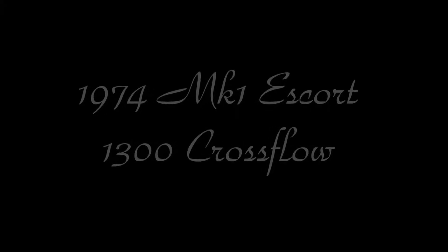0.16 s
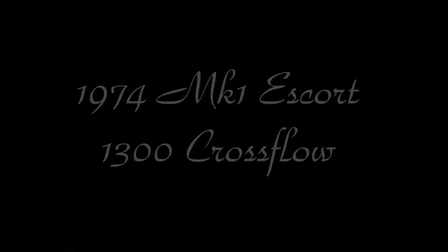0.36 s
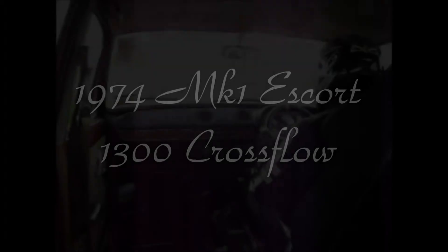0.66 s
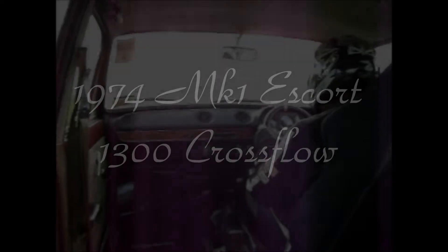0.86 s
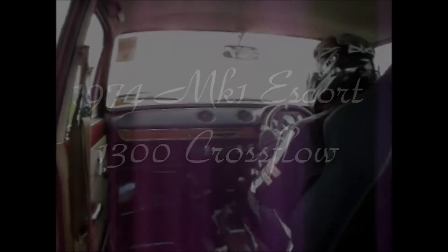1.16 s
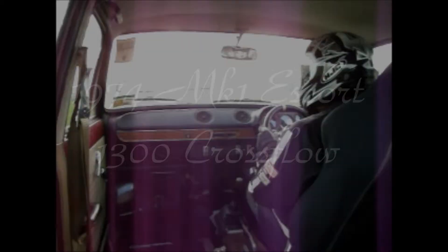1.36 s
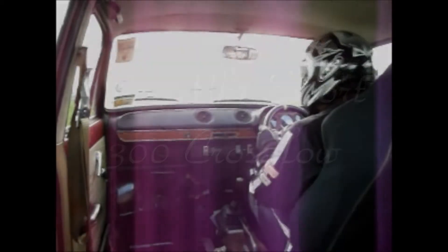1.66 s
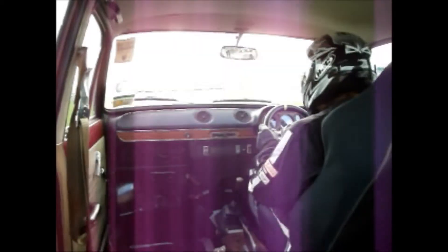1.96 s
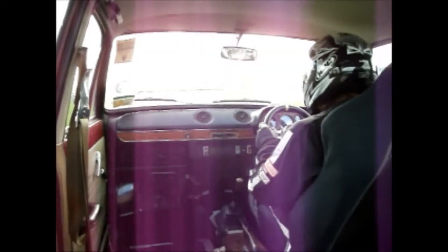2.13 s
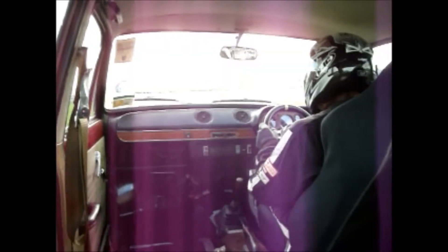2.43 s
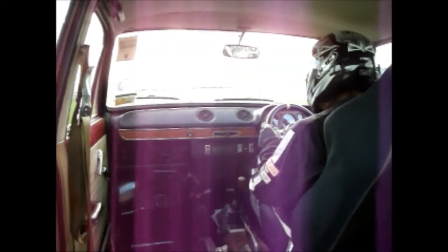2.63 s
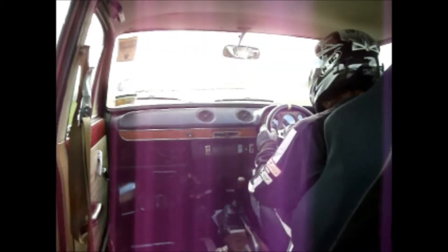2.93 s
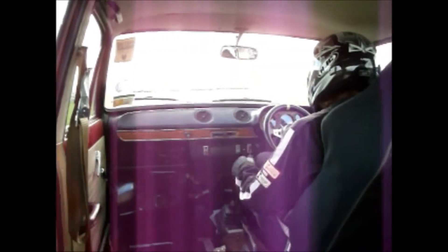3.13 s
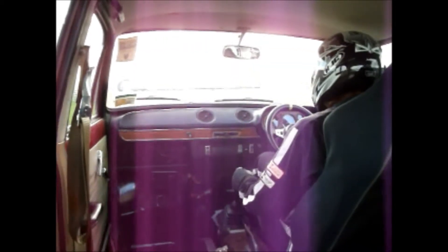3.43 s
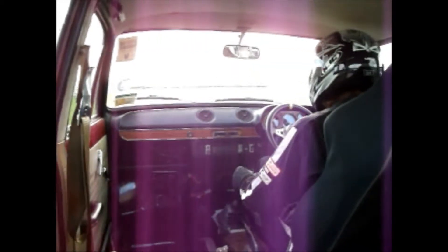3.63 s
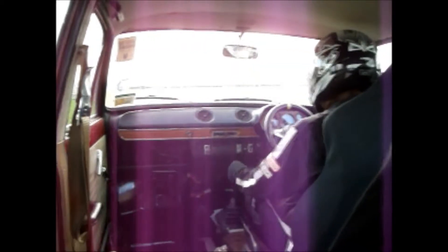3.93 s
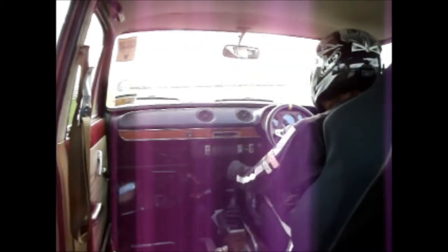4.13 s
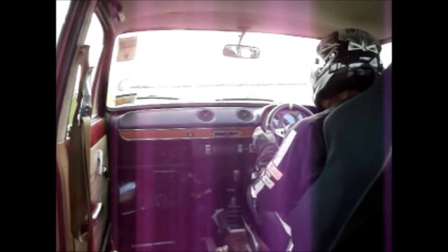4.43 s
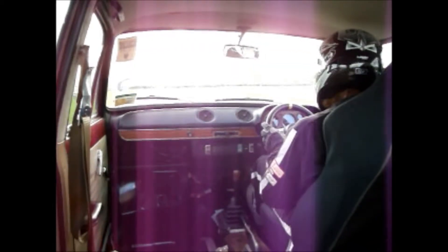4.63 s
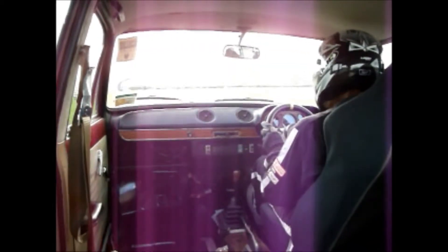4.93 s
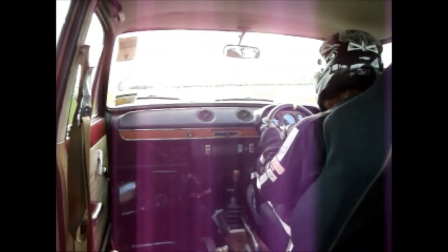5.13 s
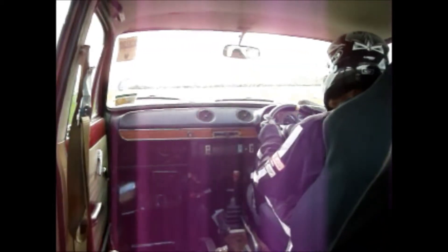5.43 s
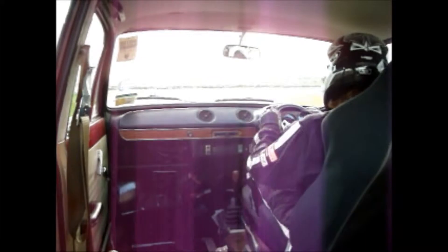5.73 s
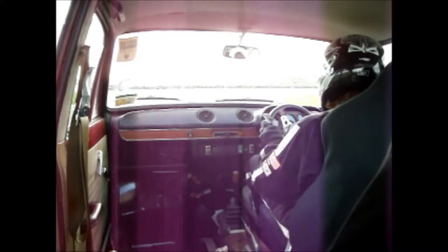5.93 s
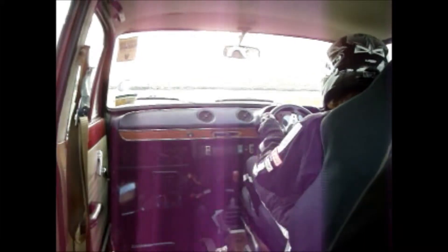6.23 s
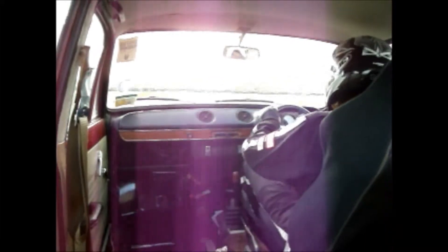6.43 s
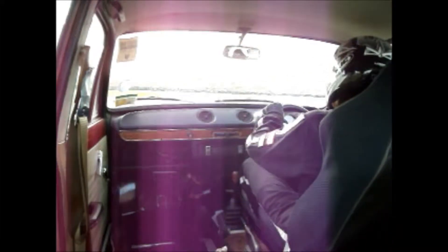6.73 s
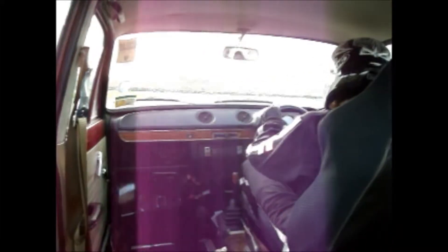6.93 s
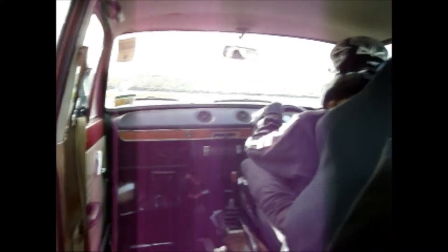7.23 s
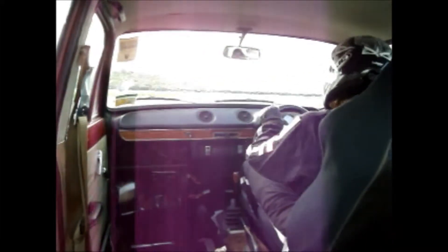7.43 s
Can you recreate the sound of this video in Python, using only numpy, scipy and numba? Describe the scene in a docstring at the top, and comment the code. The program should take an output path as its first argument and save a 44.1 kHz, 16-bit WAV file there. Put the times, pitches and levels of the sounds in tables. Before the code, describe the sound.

Wind buffets rapidly through an open window while a small petrol engine booms at steady high revs, heard on a slightly muffled microphone inside the cabin. The car brakes with a shudder and a faint gear whine, and the engine pitch sinks. A quick rev marks a downshift, followed by wavering tyre squeal with brief shrieks as the car slides round a track corner and accelerates again.

```python
"""Inside a small four-cylinder saloon on a race track. The sound cuts in with the engine pulling, louder
from about 1 s, over road and wind roar. Air throbs through an open window about twenty times a second.
A fast limiter turns everything down under each throb, so the whole sound flutters. Near 3 s the
driver lifts off, the gears whine and the body shudders under braking. A downshift follows just after
5 s, then the car slides and its tyres squeal as the rubber sticks and slips."""
import sys
import numpy as np
from scipy import signal
from scipy.fft import rfft, irfft, next_fast_len
from scipy.io import wavfile
from numba import njit

SR = 44100
rng = np.random.default_rng(int(sys.argv[2]) if len(sys.argv) > 2 else 0)


def materialize(psi):
    """Save the field psi as 16-bit PCM at rate SR to the path in sys.argv[1].

    A 1-D psi becomes a single channel; in a 2-D psi each row is a channel.
    """
    bounded = np.clip(np.atleast_2d(psi).T, -1, 1)
    quanta = np.round(bounded * 32767).astype(np.int16)
    wavfile.write(sys.argv[1], SR, quanta)


N = 333837
TIME = np.arange(N) / SR


def from_db(db):
    """Turn decibels into a number to multiply by."""
    return 10 ** (np.asarray(db) / 20)


def curves(table):
    """Join a table's timed points with straight lines, one curve for each column after the time."""
    times, *columns = np.transpose(table)
    return [np.interp(TIME, times, column) for column in columns]


def unit_level(x):
    """Scale a signal to an average (rms) size of 1."""
    return x / np.std(x)


def wobble(rate_hz):
    """A smooth random wiggle of size 1 that turns about rate_hz times a second."""
    smooth = signal.resample_poly(rng.standard_normal(8192), 8, 1)
    return unit_level(np.interp(TIME * rate_hz * 8, np.arange(len(smooth)), smooth))


def noise(colour):
    """Noise of size 1; the colour table says how strong its low and high pitches are."""
    hz, db = np.transpose(colour)
    size = next_fast_len(N)
    bins_hz = np.maximum(np.fft.rfftfreq(size, 1 / SR), 1)
    gain = from_db(np.interp(np.log(bins_hz), np.log(hz), db))
    return unit_level(irfft(rfft(rng.standard_normal(size)) * gain, size)[:N])


def angle(hz):
    """The angle of something turning hz times a second, from a random start."""
    return 2 * np.pi * (np.cumsum(hz) / SR + rng.random())


def tone(phase):
    """A pure tone of size 1."""
    return np.sqrt(2) * np.sin(phase)


def held(start, end, attack_s, release_s):
    """Rise from 0 to 1 at the start, hold, and fall back after the end."""
    return np.clip((TIME - start) / attack_s, 0, 1) * np.clip(1 - (TIME - end) / release_s, 0, 1)


def swells(table):
    """Smooth bumps in decibels, one for each row of time_s, length_s, rise_db."""
    return sum(db * np.exp(-(2 * (TIME - s) / length) ** 2) for s, length, db in table)


# Colour of the road and wind roar: pitch_hz, relative_db
ROAR_COLOUR = [(40, -4.5), (80, 1), (130, -1.5), (190, -2.5), (260, -4.5), (400, -11), (560, -13.5),
               (800, -14.5), (1050, -17), (1300, -21.5), (1750, -18), (2500, -25.5), (3700, -30.5),
               (4600, -32.5), (5300, -42)]
# Moments when the roar briefly swells: time_s, length_s, rise_db
ROAR_SWELLS = [(0.677, 0.018, 3.5), (0.745, 0.015, 5), (0.795, 0.025, 9.5), (0.85, 0.02, 6),
               (0.965, 0.021, 6.5), (1.166, 0.023, 6.5), (1.766, 0.019, 3.5), (2.064, .025, 5.5),
               (2.73, .015, 3.5), (3.215, .035, 7.5), (3.428, .04, 7), (3.475, 0.021, 6),
               (3.711, 0.02, 3.5), (3.795, 0.031, 5), (4.042, 0.078, 3), (4.775, 0.017, 7),
               (5.18, .02, 8.5), (5.298, 0.014, 7), (5.89, 0.024, 2.5), (6.239, .03, 5.5), (6.393, .03, 1),
               (6.637, .012, -0.5)]
# Colour of the shuddering car body: pitch_hz, relative_db
BODY_COLOUR = [(120, -24.5), (270, 0.5), (380, -2), (540, -3), (800, -15.5), (1250, -11), (2500, -24.5),
               (5000, -35)]
def road(roar_db=-23.5, shudder_db=-29.5, gust_db=1, grit_db=2):
    """Tyres and wind roar, roughened by the track surface; hard braking shakes the body."""
    slowing_db = np.interp(TIME, [3.6, 6.3], [0, -1.5])
    roar = from_db(roar_db + slowing_db + swells(ROAR_SWELLS)) * noise(ROAR_COLOUR)
    braking = held(3.37, 4.15, attack_s=.05, release_s=.9)
    shudder = from_db(shudder_db) * braking * noise(BODY_COLOUR)
    return from_db(gust_db * wobble(9) + grit_db * wobble(160)) * (roar + shudder)


# Engine braking, when the wheels turn the engine: start_s, end_s, rise_db
ENGINE_BRAKING = [(3.37, 3.702, 8.5), (5.81, 7.6, 12)]
# Whine of the gears that drive the wheels, falling as the car slows: time_s, pitch_hz, level_db
GEAR_WHINE = [(2.9, 568.4, -60), (3.3, 560, -43), (3.6, 552.7, -37), (4.1, 525.6, -46.5),
              (4.45, 507.9, -38.5), (4.8, 494.1, -42.5), (5.2, 460, -46.5)]
def driveline(base_db=-32.5, octave_db=-18, settle_s=.45, settled_share=.45):
    """The body drones at three times engine speed, most in engine braking; gears whine off the pedal."""
    phase = angle(3 * curves(ENGINE_SPEED)[0] * (1 + .0073 * wobble(30)))
    drone_db = base_db + wobble(20)
    for start, end, rise_db in ENGINE_BRAKING:
        first_tug = np.exp(-np.maximum(TIME - start, 0) / settle_s)
        strength = settled_share + (1 - settled_share) * first_tug
        drone_db += rise_db * strength * held(start, end, attack_s=.08, release_s=.25)
    drone = from_db(drone_db) * (tone(phase) + from_db(octave_db) * tone(2 * phase))
    whine_hz, whine_db = curves(GEAR_WHINE)
    whine = from_db(whine_db + 1.2 * wobble(25)) * tone(angle(whine_hz * (1 + .006 * wobble(40))))
    return drone + whine


# Presses of the throttle pedal: start_s, end_s, engine_rise_db, boom_rise_db
PEDAL_PRESSES = [(0.404, 1.105, 9, 1.5), (1.0, 2.943, 11.5, 8), (5.27, 5.39, 3.5, 12.5),
                 (5.518, 5.67, -2, 10), (7.122, 7.598, 14, 0)]
def throttle(shut_engine_db=-12.5, shut_boom_db=-26):
    """Pressing the pedal makes the engine and its exhaust boom louder; the biggest rise wins."""
    rises = [np.outer(rise_db, held(start, end, attack_s=.063, release_s=.09))
             for start, end, *rise_db in PEDAL_PRESSES]
    engine_rise_db, boom_rise_db = np.max(rises, axis=0)
    return shut_engine_db + engine_rise_db, shut_boom_db + boom_rise_db


# Speed of the engine's crankshaft (pulling, lift, downshift, corner): time_s, turns_per_s
ENGINE_SPEED = [(0.6, 67.7), (1.6, 68.1), (2.95, 71.5), (3.12, 70.8), (3.45, 70.6), (3.8, 65.3),
                (4.03, 59.7), (4.25, 54.7), (4.5, 49.5), (4.75, 51.6), (5.0, 61.8), (5.2, 55.4),
                (5.28, 72.8), (5.4, 78.7), (5.7, 73.8), (6.2, 67.7), (7.28, 66.7), (7.57, 67)]
# Exhaust tones beside the boom: cycles_per_turn, relative_db
EXHAUST_TONES = [(1, -34), (1.5, -40), (2.5, -37), (3.5, -39.5), (4, -30.5), (4.5, -43), (6, -51.5),
                 (8, -44)]
# Pitches at which the body panels like to ring: pitch_hz, width_hz, relative_db
PANEL_RINGS = [(631.4, 25, -36), (665.5, 27, -32.5), (799, 32, -42), (847, 33, -42), (1062, 92, -44.5),
               (1660, 140, -47.5), (1846, 89, -49.5)]
# Colour of the air intake and valves, heard from the cabin: pitch_hz, relative_db
RASP_COLOUR = [(300, -17), (700, -1.5), (1300, -7), (1620, -2.5), (1720, 2), (1790, -1), (1870, 5),
               (2000, -5), (2600, -7.5), (5000, -16)]
def engine(rough_db=3, rasp_db=-43, flutter_db=1.41, lumpy_db=2.5, smooth_hz=67.46, lumpy_span_hz=11):
    """Two firings a turn boom in the exhaust; panels ring as the engine's overtones sweep past them."""
    engine_db, boom_db = throttle()
    crank_hz = curves(ENGINE_SPEED)[0] * (1 + .0013 * wobble(25))
    crank = angle(crank_hz)
    # At low speed the cylinders fire unevenly and the boom turns ragged.
    lumpy = np.clip((smooth_hz - crank_hz) / lumpy_span_hz, 0, 1)
    boom_gain = from_db(boom_db + (flutter_db + lumpy_db * lumpy) * wobble(45))
    boom = boom_gain * tone(2 * crank + .6 * lumpy * wobble(45))
    exhaust = sum(from_db(db + rough_db * wobble(30)) * tone(cycles * crank + 2 * np.pi * rng.random())
                  for cycles, db in EXHAUST_TONES)
    panels = 0
    for cycles in range(8, 30):
        ring = sum(from_db(db) / (1 + (2 * (cycles * crank_hz - hz) / width) ** 2)
                   for hz, width, db in PANEL_RINGS)
        panels += ring * (1 + .25 * wobble(40)) * tone(cycles * crank + 2 * np.pi * rng.random())
    # One puff of rasp per firing, every other one stronger.
    puffs = (1 + np.cos(2 * crank)) ** 2 * (1 + .5 * np.cos(crank))
    rasp = from_db(rasp_db) * unit_level(puffs * noise(RASP_COLOUR))
    return boom + from_db(engine_db) * (exhaust + panels + rasp)


def tread(hz, jitter=.012, wander=.0064, flicker_db=4, overtone_db=-27.5):
    """Rubber catches and lets go of the asphalt at an unsteady rate, making a wavering tone."""
    slip = angle(hz * (1 + jitter * wobble(200) + wander * wobble(35)))
    flicker = from_db(flicker_db * wobble(45))
    return unit_level(flicker * (tone(slip) + from_db(overtone_db) * tone(2 * slip)))


# Squeal of the higher-pitched tyre in the slide: time_s, level_db, pitch_hz
SQUEAL = [(5.74, -43, 1510), (5.92, -37, 1495), (6.25, -34.5, 1501), (6.55, -34.5, 1465), (6.82, -36, 1455),
          (7.05, -31.5, 1471), (7.25, -30.5, 1468), (7.46, -30.5, 1460), (7.51, -42, 1474)]
# Moments when a tyre grips harder and shrieks: time_s, length_s, high_rise_db, low_rise_db
SHRIEKS = [(6.241, 0.049, 8, 12), (6.375, .05, 13.5, 2), (7.162, .04, 0, 6), (7.231, .08, 7.5, -7),
           (7.368, .04, 9.5, 1)]
# Short chirps of the other tyres: start_s, end_s, pitch_hz, level_db
TYRE_CHIRPS = [(5.351, 5.545, 1867, -40.5), (5.72, 6.168, 1900, -43), (5.813, 6.1, 1723, -44),
               (7.147, 7.558, 1080, -38)]
def tyres(low_pitch_ratio=.922, low_db=1, unload_db_per_s=1, attack_s=.043, scrub_db=-10, judder_db=-25):
    """Two tyres squeal and scrape, the lower one slowly losing its load; the others chirp."""
    slide_db, squeal_hz = curves(SQUEAL)
    elapsed_s = np.maximum(TIME - SQUEAL[0][0], 0)
    grip = np.minimum(elapsed_s / attack_s, 1) * from_db(slide_db)
    high_rise_db = swells((s, length, db) for s, length, db, _ in SHRIEKS)
    low_rise_db = swells((s, length, db) for s, length, _, db in SHRIEKS)
    high_gain = grip * from_db(high_rise_db)
    low_gain = grip * from_db(low_rise_db + low_db - unload_db_per_s * elapsed_s)
    squeal = high_gain * tread(squeal_hz) + low_gain * tread(low_pitch_ratio * squeal_hz)
    hiss = noise([(700, -25), (1100, -7), (1430, -.5), (1800, -10.5),
                  (2600, -15.5), (3200, -21.5), (3470, -10), (3800, -38)])
    scrub = from_db(scrub_db) * (high_gain + low_gain) * hiss
    chirps = 0
    for start, end, hz, db in TYRE_CHIRPS:
        swell = np.sin(np.pi * np.clip((TIME - start) / (end - start), 0, 1))
        chirps += from_db(db) * swell * tread(hz=np.full(N, hz), jitter=.007, wander=.005)
    # The whole tyre shakes more and more as the slide goes on.
    judder = np.interp(TIME, [5.8, 7], [0, 1]) * tread(hz=np.full(N, 88.), jitter=.17)
    return squeal + scrub + chirps + from_db(judder_db) * judder


# Strength of the air flowing across the open window: time_s, level_db
WINDOW_FLOW = [(0.58, -16), (1.05, -13), (1.6, -15), (2.3, -12.5), (2.8, -14.5), (3.25, -10.5),
               (3.65, -13.5), (4.5, -9), (5.1, -10.5), (5.6, -16), (6.8, -13), (7.57, -18)]
# Moments when the throb collapses: time_s, length_s, drop_db
FLOW_LULLS = [(0.79, 0.044, 6.5), (1.66, 0.21, 6), (2.07, 0.063, 7), (2.43, 0.093, 16.5), (2.88, 0.22, 7.5),
              (3.21, 0.044, 8), (3.44, .1, 8.5), (3.76, .14, 6), (4.03, 0.11, 8), (4.73, 0.099, 7.5),
              (5.38, 0.097, 7), (5.89, 0.092, 12.5), (6.05, 0.12, 7), (6.23, .05, 5.5), (6.38, .07, 5.5),
              (6.6, .05, 5.5), (6.87, 0.061, 8), (7.03, 0.064, 7.5), (7.19, .07, 5)]
# Colour of the swirling air that comes with the throb: pitch_hz, relative_db
RUMBLE_COLOUR = [(4, -13), (10, 1), (22, 1), (35, 7), (55, 2.5), (90, -9.5), (160, -18), (400, -63)]
def open_window(throb_hz=18.7, throb_db=-.5, rumble_db=-6, gust_db=1, lopsided=.2):
    """The cabin is like a bottle and the window its neck: wind across it makes the air inside throb."""
    phase = angle(throb_hz * (1 + .11 * wobble(22)))
    throb = tone(phase) - lopsided * tone(2 * phase + np.pi / 2)  # crests sharper than troughs
    flow_db = curves(WINDOW_FLOW)[0] - swells(FLOW_LULLS) + gust_db * wobble(14)
    return from_db(flow_db) * (from_db(throb_db) * throb + from_db(rumble_db) * noise(RUMBLE_COLOUR))


def scene():
    """Everything heard from behind the seats, in one channel."""
    return (engine() + driveline() + tyres() + open_window() + road())[None]


@njit
def limiter(x, ceiling, overshoot_db=4.5, attack_s=.0007, recovery_db_per_s=219.5):
    """Each peak over the ceiling knocks the volume down too far; it climbs back, so the sound pumps."""
    out = np.empty(len(x))
    cut_db, pull_db = 0., 0.
    step = 1 / (attack_s * SR)
    for i in range(len(x)):
        out[i] = x[i] * 10 ** (-cut_db / 20)
        pull_db = overshoot_db if abs(out[i]) > ceiling else pull_db * (1 - step)
        cut_db = max(cut_db + pull_db * step - recovery_db_per_s / SR, 0.)
    return out


def record(dry, boost_db=15.5, ceiling_db=-8.5, start_s=.582, mic_top_hz=5450, top_hz=15200):
    """The sound starts abruptly; a small camera squashes the loud peaks and loses the high treble."""
    limited = limiter(dry[0] * from_db(boost_db), from_db(ceiling_db))
    clipped = np.clip(limited, -.5, .5) * (TIME >= start_s)
    dulled = signal.sosfilt(signal.ellip(10, .3, 60, mic_top_hz, fs=SR, output="sos"), clipped)
    return signal.sosfilt(signal.ellip(8, .2, 70, top_hz, fs=SR, output="sos"), dulled)[None]


dry = scene()
out = record(dry)
materialize(out)
```